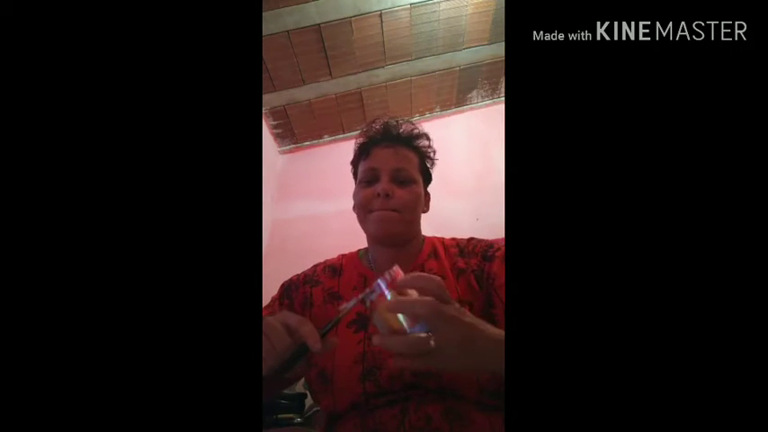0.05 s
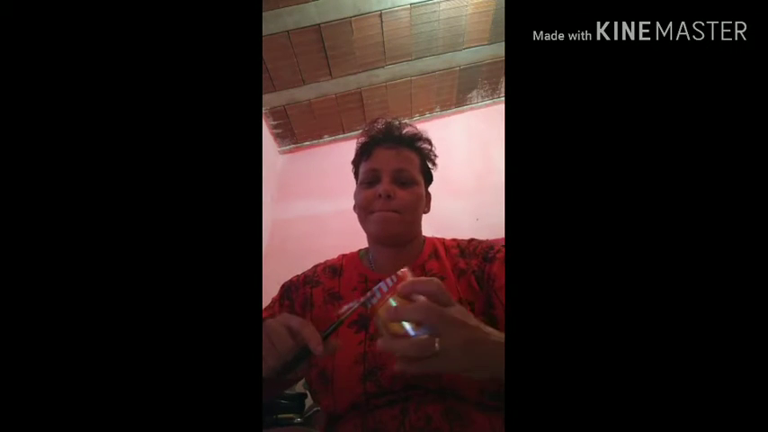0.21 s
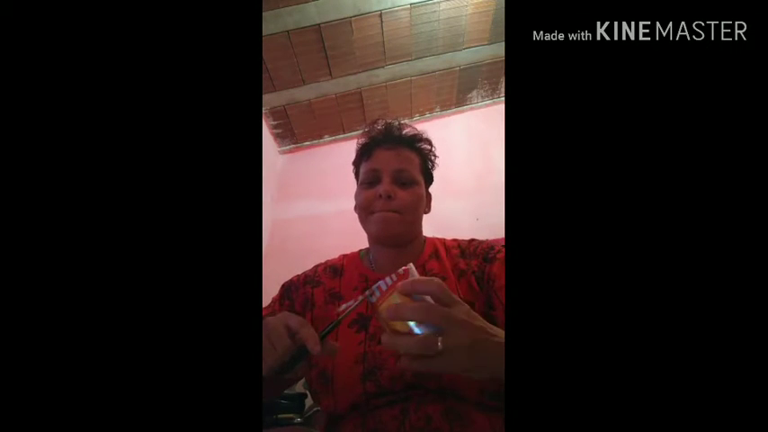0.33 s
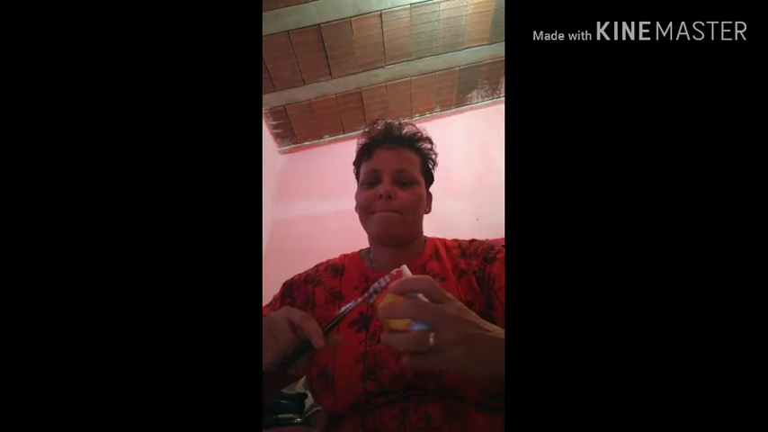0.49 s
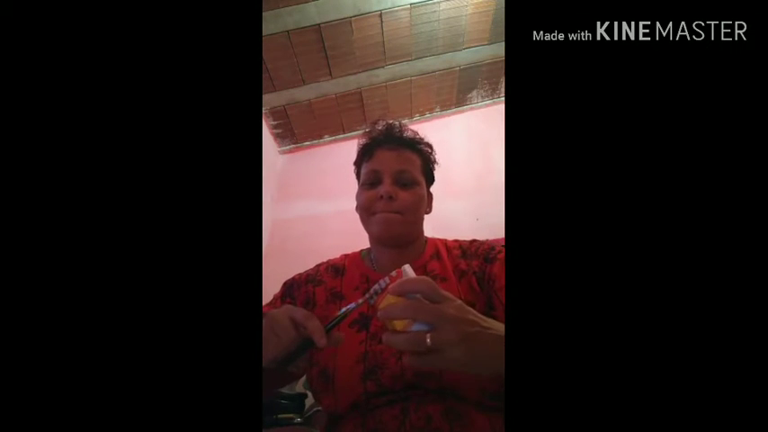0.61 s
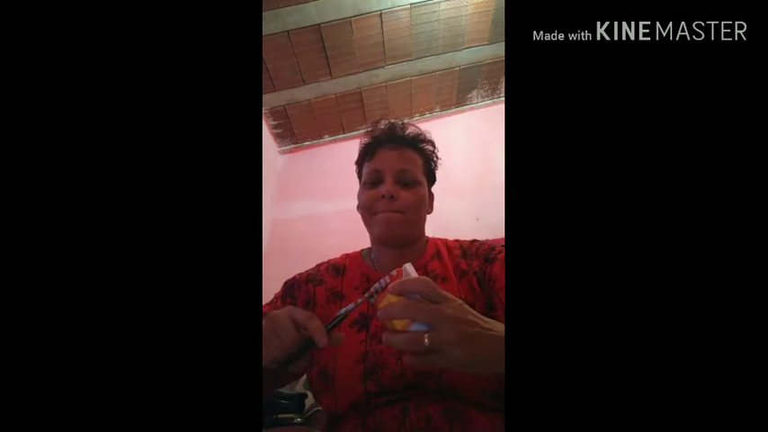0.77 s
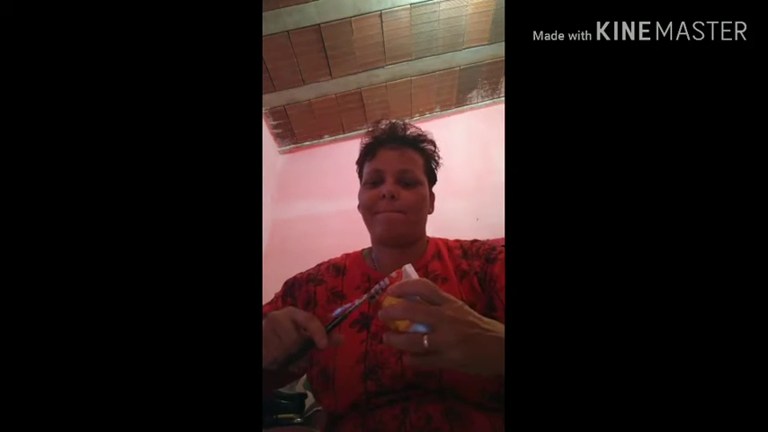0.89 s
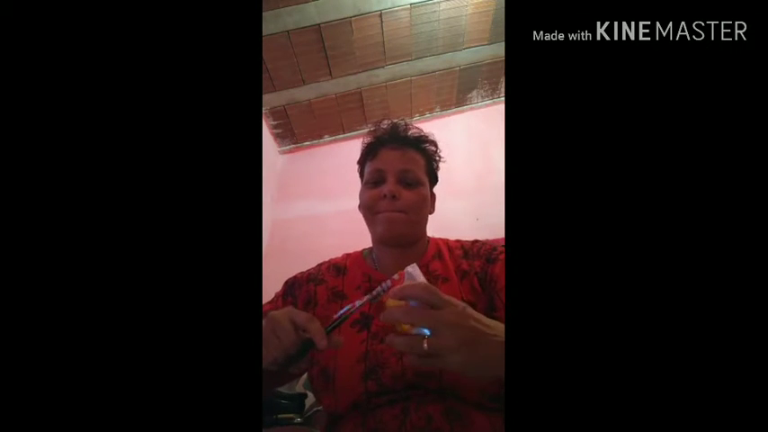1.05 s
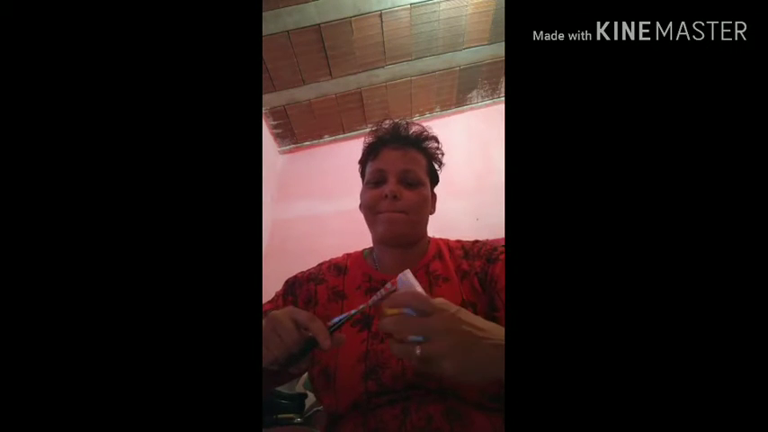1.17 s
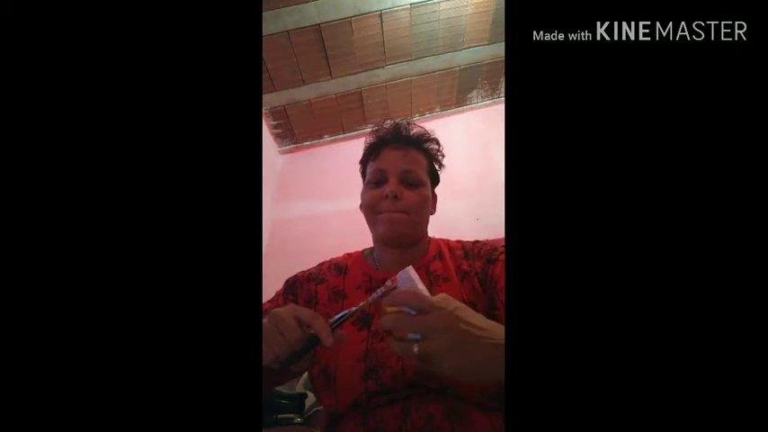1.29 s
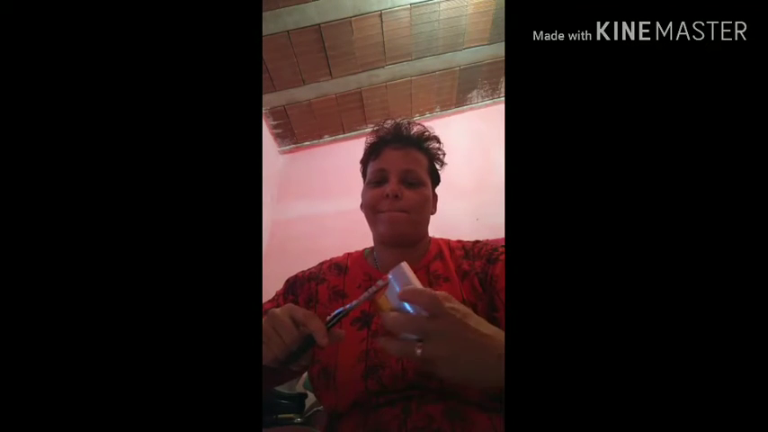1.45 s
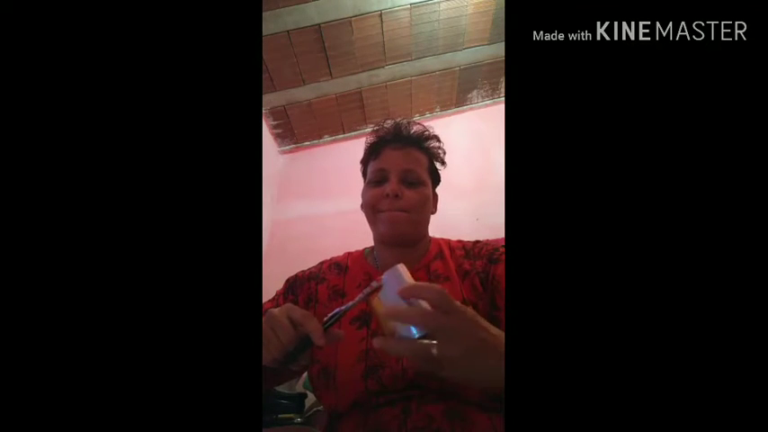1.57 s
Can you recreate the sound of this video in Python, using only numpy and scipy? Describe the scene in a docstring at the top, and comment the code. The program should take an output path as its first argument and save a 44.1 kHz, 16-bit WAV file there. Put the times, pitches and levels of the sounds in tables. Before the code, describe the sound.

A knife cuts a thin hollow can, heard close in a quiet room. After faint hiss, a sharp loud snap and bright scrape burst at 0.2 s, with hollow knocks until 0.4. Rougher scraping and bumps follow at 0.55-0.75, a crisp scratch at 0.83, lighter metallic pings around 0.97-1.13, another strong snap and knocks at 1.24-1.3, then tiny ticks near 1.5. Low handling rumble; treble leans left.

```python
"""Knife cutting into a drink can

A knife cuts into a thin can held near two microphone ports in a quiet room. The wall snaps as dying crackles,
the blade scrapes as dense slips that ring it, and the hollow can booms near 850 Hz in decaying mode pairs.
Resonant noise swells with the effort as a low rumble, over coloured hiss and a noise echo tail.
The left port hears the treble louder and a little earlier."""
import sys
import numpy as np
from scipy import signal
from scipy.fft import rfft, irfft, next_fast_len
from scipy.io import wavfile

SR = 44100
rng = np.random.default_rng(int(sys.argv[2]) if len(sys.argv) > 2 else 0)


def invert_db(level):
    """Linear amplitude ratio for a level in decibels (20 dB per decade), elementwise."""
    return 10 ** (np.asarray(level, dtype=float) / 20)


def pcm_store(signal):
    """Save signal as 16-bit PCM."""
    levels = np.round(np.clip(np.atleast_2d(signal), -1, 1) * 32767)
    wavfile.write(sys.argv[1], SR, levels.astype(np.int16).T)


N = 72765  # length [samples]


def rms_one(x):
    """Scales to rms 1."""
    return x / np.sqrt(np.mean(x ** 2) + 1e-20)


def at_hz(points, hz):
    """Reads a table on a log-frequency axis."""
    p = np.array(points, float)
    return np.interp(np.log(np.maximum(hz, 1)), np.log(p[:, 0]), p[:, 1])


def in_time(rows, column, outside=-120):
    """Reads one column of a curve at every sample; outside=None holds the end values."""
    p = np.array(rows, float)
    return np.interp(np.arange(N) / SR, p[:, 0], p[:, column], left=outside, right=outside)


def coloured(x, spectrum):
    """Gives a white signal of rms 1 a spectrum, keeping its mean power."""
    gain = invert_db(at_hz(spectrum, np.fft.rfftfreq(N, 1 / SR)))
    return irfft(rfft(x) * rms_one(gain), N)


def resonate(x, hz, width_hz):
    """Two-pole resonance with gain 1 on top."""
    r = np.exp(-np.pi * width_hz / SR)
    zeros = [(1 - r * r) / 2, 0, (r * r - 1) / 2]
    poles = [1, -2 * r * np.cos(2 * np.pi * hz / SR), r * r]
    return signal.lfilter(zeros, poles, x + 1e-18)


def body(x, peaks):
    """Parallel resonances with alternating signs; a wide one passes no more noise than a narrow one."""
    out = 0
    for k, (hz, width, db) in enumerate(peaks):
        even_power = np.sqrt(SR / np.pi / width)
        out = out + (-1) ** k * invert_db(db) * resonate(x, hz, width) * even_power
    return out


# spectrum of the room hiss: (frequency [Hz], relative level per Hz [dB])
HISS_SPECTRUM = [(18, -38), (40, -10.5), (120, -8), (250, -24.5), (311, -16.5), (499, -13.5), (889, -27.5),
                 (1040, -30), (1590, -24), (3200, -25.5), (6210, -33.5), (9460, -30.5), (10200, -35.5),
                 (14800, -29.5), (16000, -39)]
# faint thin whines: (frequency [Hz], width [Hz], level [dB])
WHINES = [(10540, 200, -78), (9800, 80, -92)]
HISS_DB, HISS_ALIKE = -68, 0.39  # level; share of the power common to both ports


def hiss():
    """The room's coloured noise, partly alike at both ports, with whines of narrow-band noise."""
    shared, left, right = (coloured(x, HISS_SPECTRUM) for x in rng.standard_normal((3, N)))
    pair = np.sqrt(HISS_ALIKE) * shared + np.sqrt(1 - HISS_ALIKE) * np.array([left, right])
    return invert_db(HISS_DB) * pair + body(rng.standard_normal(N), WHINES)


# swell of the effort: (time [s], upper tones' relative level [dB], lower tones' relative level [dB])
EFFORT_SWELL = [(0.0, -80, -53), (0.16, -76.5, -89.5), (0.202, -89, -64), (0.228, -52, -72),
                (0.256, -52, -61), (0.302, -53.5, -53.5), (0.358, -66.5, -54.5), (0.496, -72, -78),
                (0.532, -51.5, -66), (0.726, -57.5, -52.5), (0.772, -47.5, -53), (0.794, -50, -59.5),
                (0.812, -56, -47.5), (0.89, -50.5, -55.5), (0.922, -68.5, -56.5), (1.13, -69, -64),
                (1.276, -73, -59), (1.318, -56.5, -61), (1.424, -87, -65), (1.506, -73.5, -60),
                (1.636, -63.5, -73), (1.65, -56.5, -74)]
# rumble resonances: (frequency [Hz], width of the narrower pass [Hz], relative level [dB])
RUMBLE_TONES = [(70, 16, -1.5), (95, 19, 1.5), (121.8, 6, 2.5), (177.6, 5.1, -0.5), (230, 16, -16)]
RUMBLE_DB, LOWER_TONES_DB, UPPER_FROM_HZ = 2.5, -4, 140


def rumble():
    """Noise through a few low resonances, twice for dark valleys, swelling with the effort."""
    white = rng.standard_normal((len(RUMBLE_TONES), N + SR // 4))
    upper = in_time(EFFORT_SWELL, 1, None)
    lower = in_time(EFFORT_SWELL, 2, None) + LOWER_TONES_DB
    out = 0
    for (hz, width, db), noise in zip(RUMBLE_TONES, white):
        swell = upper if hz > UPPER_FROM_HZ else lower
        # the first quarter second lets the resonances settle
        tone = resonate(resonate(noise, hz, width), hz, 4.2 * width)[-N:]
        out = out + invert_db(RUMBLE_DB + db + swell) * rms_one(tone)
    return out


# decay of the room: (frequency [Hz], t60 [s])
ROOM_DECAY = [(100, 0.32), (1000, 0.2), (5000, 0.2), (15000, 0.19)]
ROOM_DB, FIRST_ECHO_S = -7.5, 0.0046
RIGHT_ROOM_DB, SHADOW_FROM_HZ = 5, 990  # extra echo at the right port; band floors it applies above


def room(x):
    """Echo tail of noise dying octave by octave, its own at each port; the shadowed right hears more treble."""
    t, tail = np.arange(SR // 2) / SR, 0
    white = rng.standard_normal((2, len(t)))
    for low in 62.5 * 2.0 ** np.arange(8):
        octave = signal.butter(2, [low, 2 * low], "band", fs=SR, output="sos")
        fade = invert_db(-60 * t / at_hz(ROOM_DECAY, np.sqrt(2) * low))
        port_gain = invert_db(np.array([[0], [RIGHT_ROOM_DB * (low > SHADOW_FROM_HZ)]]))
        tail = tail + signal.sosfilt(octave, white) * fade * port_gain
    tail = tail * np.clip(t / FIRST_ECHO_S - 1, 0, 1)
    tail = tail / np.sqrt(np.sum(tail[0] ** 2))
    return invert_db(ROOM_DB) * signal.fftconvolve(x[None], tail, axes=1)[:, :N]


# left port's level above the right's: (frequency [Hz], level [dB])
LEFT_ABOVE_RIGHT = [(60, 11), (110, 14), (200, 3.5), (380, 1), (700, -5), (1290, 3.5), (2380, 13),
                    (4400, 17), (8120, 15), (15000, 13.5)]
# the housing turns the phase at the right port: (frequency [Hz], phase [radians])
HOUSING_TURN = [(500, -0.5), (850, 0.62), (1030, 0.44), (1550, 3.5), (3000, 8)]


def ports(pair, lag_s, turn):
    """The right port lags, loses or gains by frequency, and has its phase turned by the housing if asked."""
    size = next_fast_len(N + 8192)
    hz = np.fft.rfftfreq(size, 1 / SR)
    phase = turn * at_hz(HOUSING_TURN, hz) - 2 * np.pi * hz * lag_s
    path = invert_db(-at_hz(LEFT_ABOVE_RIGHT, hz)) * np.exp(1j * phase)
    padded = np.pad(pair[1], 4096, mode="reflect")
    right = irfft(rfft(padded, size) * path, size)[4096:4096 + N]
    return np.array([pair[0], right])


# the hollow can is knocked or buckles: (time [s], relative level [dB], pitch [Hz], t60 [s])
CAN_KNOCKS = [(0.123, -47.5, 820, 0.11), (0.204, -29.5, 825.5, 0.068), (0.345, -39, 875, 0.093),
              (0.363, -30, 858, 0.065), (0.572, -31, 886, 0.094), (0.618, -33, 905, 0.092),
              (0.655, -30.5, 837, 0.041), (0.676, -50.5, 831, 0.13), (0.736, -29, 870, 0.046),
              (0.946, -54, 903, 0.08), (0.965, -44.5, 922, 0.15), (0.98, -43.5, 879, 0.14),
              (1.051, -32, 870.4, 0.048), (1.23, -40.5, 843, 0.11), (1.258, -34.5, 871, 0.042),
              (1.286, -29, 894.6, 0.06), (1.466, -61, 859, 0.09), (1.514, -67, 880, 0.11)]
KNOCK_DB, KNOCK_RISE_S = 6, 0.0025
PAIR_SPLIT, PAIR_DB = 1.06, -7.5  # second mode: frequency ratio and level to the first


def knocks():
    """The hollow booms as a close pair of modes that beat while they die."""
    out, t = np.zeros(N + SR), np.arange(SR // 2) / SR
    for s, db, hz, t60 in CAN_KNOCKS:
        start = int(s * SR)
        fade = (1 - np.exp(-t / KNOCK_RISE_S)) ** 2 * invert_db(-60 * t / t60)
        tone = np.sin(2 * np.pi * hz * t) + invert_db(PAIR_DB) * np.sin(2 * np.pi * hz * PAIR_SPLIT * t)
        out[start:start + len(t)] += invert_db(db + KNOCK_DB) * fade * tone
    return out[:N]


# single dying tones of the can, from low knocks to high metal pings:
# (time [s], level [dB], pitch [Hz], t60 [s])
SINGLE_TONES = [(0.126, -63, 7250, 0.081), (0.591, -51.5, 492, 0.22), (0.737, -36, 1786, 0.04),
                (0.974, -50, 1760, 0.05), (0.974, -47.5, 2740, 0.077), (.975, -52, 3750, 0.078),
                (1.052, -43, 2314, 0.043), (1.07, -52.5, 2256, 0.14), (1.088, -54, 2320, 0.042),
                (1.05, -51, 3150, 0.068), (1.064, -54.5, 4290, 0.079), (1.13, -52, 2305, 0.082),
                (1.15, -54.5, 4650, 0.061), (1.312, -46.5, 401, 0.081), (1.33, -49.5, 473, 0.079),
                (1.465, -60.5, 5900, 0.044), (1.465, -60, 1880, 0.032), (1.514, -60, 9500, .1),
                (1.515, -55, 5330, 0.026), (1.513, -58, 1737, 0.048), (.221, -33, 787.5, 0.096),
                (.545, -51, 853, .1), (.825, -41, 840, 0.044), (1.135, -54, 827, .08),
                (1.34, -48.5, 890, 0.027), (.01, -66.5, 1258, 0.21), (.98, -49.5, 4750, 0.11),
                (1.218, -45.5, 1764, .08)]
TONE_RISE_S = 0.00067


def single_tones():
    """The can sounds one dying sine at a time, from low knocks to high metal pings."""
    out, t = np.zeros(N + SR), np.arange(SR // 2) / SR
    for s, db, hz, t60 in SINGLE_TONES:
        start = int(s * SR)
        fade = (1 - np.exp(-t / TONE_RISE_S)) ** 2 * invert_db(db - 60 * t / t60)
        out[start:start + len(t)] += fade * np.sin(2 * np.pi * hz * t)
    return out[:N]


# the metal wall snaps: (time [s], relative level [dB], colour [Hz], crackle time constant [ms])
WALL_SNAPS = [(0.2026, -10.5, 13000, 2.2), (0.2077, -9.5, 8280, 2), (0.3101, -27, 6070, 2.2),
              (0.3394, -35.5, 9440, 3.8), (0.3454, -35, 3100, 1.15), (0.3601, -30, 1740, 3.6),
              (0.3821, -25, 8020, 0.83), (0.5542, -39, 5550, 1.8), (0.629, -23, 3300, 1.6),
              (0.6544, -25.5, 7010, 2.7), (0.8278, -45.5, 8330, 1.1), (0.9732, -29.5, 10000, 1.9),
              (0.9782, -33.5, 8270, 2.5), (1, -33, 9670, 2.5), (1.0468, -34.5, 9560, 5.4),
              (1.0674, -35, 9170, 2.5), (1.1265, -40, 10600, 3.3), (1.2396, -15.5, 8520, 2.7),
              (1.2574, -26.5, 1650, 2.5), (1.4653, -58.5, 9510, 3.1), (1.5116, -58, 9600, 2.3)]
# ringing of the wall, also heard in the scrape: (frequency [Hz], undamped width [Hz], relative level [dB])
WALL_MODES = [(4680, 28, 2.5), (4850, 40, -7.5), (7200, 49, -12.5), (7080, 110, -5.5), (8010, 150, 5),
              (8290, 29, -3.5), (8660, 15, -7), (9110, 17, -4), (9540, 120, 7.5), (10370, 38, 3),
              (11060, 44, 3), (10830, 130, -9), (13700, 47, -0.5), (13800, 95, -11)]
WALL_DAMPING = 1.87  # widens every wall resonance
SNAP_DB, SNAP_BROAD_DB, WALL_DB = 4.5, -22.5, -11  # all snaps; uncoloured edge; ringing to snaps
SNAP_Q, SNAP_LOW_CUT_HZ = 3.4, 910


def snaps():
    """Each snap is a dying crackle in its own colour that also rings the wall."""
    out, t = np.zeros(N + SR), np.arange(2048) / SR
    noise = rng.standard_normal((len(WALL_SNAPS), len(t)))
    for (s, db, hz, ms), white in zip(WALL_SNAPS, noise):
        start = int(s * SR)
        burst = white * np.exp(-1000 * t / ms)
        crack = resonate(burst, hz, hz / SNAP_Q) + invert_db(SNAP_BROAD_DB) * np.diff(burst, prepend=0)
        out[start:start + len(t)] += invert_db(db + SNAP_DB) * crack / np.abs(crack).max()
    low_cut = signal.butter(3, SNAP_LOW_CUT_HZ, "high", fs=SR, output="sos")
    cracks = signal.sosfilt(low_cut, out)[:N]
    rung = body(cracks, [(hz, width * WALL_DAMPING, db) for hz, width, db in WALL_MODES])
    return cracks + invert_db(WALL_DB) * rung * np.std(cracks) / np.std(rung)


# blade strokes, one list each: (time [s], relative scrape level [dB], bite above scrape [dB])
# the bite is how far the scrape reaches the middle tones and the hollow
BLADE_STROKES = [
    [(0.19, -90, -1), (0.2, -34, -3), (0.206, -21.5, -14.5), (0.22, -35.5, -3.5), (0.304, -49, -11.5),
     (0.31, -54, 8.5), (0.33, -49.5, -17), (0.342, -46, 4), (0.358, -49.5, -2.5), (0.386, -39, -9),
     (0.392, -51.5, -4.5), (0.47, -68.5, -13)],
    [(0.53, -86, 4), (0.556, -46, -13.5), (0.592, -41.5, -2), (0.616, -42, -8.5), (0.626, -49, 9),
     (0.648, -48.5, -3), (0.656, -50, 5), (0.68, -49.5, 0.5), (0.728, -53, -8.5), (0.734, -57, 1),
     (0.79, -64.5, -11)],
    [(0.79, -53, -15), (0.796, -62, -17), (0.83, -39.5, -28.5), (0.862, -52, -21.5), (0.928, -66, -12),
     (0.96, -71.5, -16)],
    [(0.96, -75, -14), (0.976, -40, -16.5), (1.038, -59.5, -11), (1.052, -43.5, -11.5), (1.116, -63, -19),
     (1.132, -59.5, -15), (1.198, -63, -19), (1.21, -70, -9)],
    [(1.21, -71.5, -3), (1.218, -59, -4), (1.24, -36.5, -6), (1.26, -39, -5), (1.354, -57, -6.5),
     (1.42, -86, -38)],
]
# tones each stroke favours, one list each: (frequency [Hz], undamped width [Hz], relative level [dB])
FAVOURED_TONES = [
    [(8650, 900, -0.5), (1390, 66, -3.5), (2390, 130, -17)],
    [(5900, 170, 12), (1525, 110, -15), (3300, 40, -10), (9200, 970, -1)],
    [(6600, 1000, 19), (5070, 97, 2), (8310, 1300, 19.5)],
    [(10000, 170, 9.5), (1826, 70, 7.5), (3050, 52, 4.5), (3750, 46, -1), (4750, 80, 1.5), (5560, 120, 2.5)],
    [(1730, 130, 17.5), (3790, 220, 17), (8930, 850, 19)],
]
# lower ringing of the wall: (frequency [Hz], undamped width [Hz], relative level [dB])
LOWER_WALL_MODES = [(1650, 100, -10.5), (2380, 120, -27.5), (2547, 88, 7), (3170, 32, -21), (3176, 81, 4.5),
                    (3860, 110, -12), (4270, 47, -6.5), (4660, 66, -7.5), (5200, 30, -10), (6030, 40, 5),
                    (6140, 14, -8.5)]
# spectrum of the bright scrape: (frequency [Hz], relative level per Hz [dB])
EDGE_SPECTRUM = [(3290, -37.5), (5600, -9), (5930, -7), (7190, 3), (10400, -0.5), (14400, -5),
                 (15400, -3.5), (16000, -21)]
# spectrum of the middle tones: (frequency [Hz], relative level per Hz [dB])
BITE_SPECTRUM = [(620, -33.5), (1050, 2), (1550, 2.5), (1970, 4), (2650, -1.5), (3000, -7.5), (3290, -1),
                 (4060, 0), (5600, -1.5), (7280, -38), (12300, -120)]
# resonances of the hollow can: (frequency [Hz], width [Hz], relative level [dB])
HOLLOW_MODES = [(793, 40, -4.5), (849.2, 17, 1), (886, 50, -3)]
SCRAPE_DB, HOLLOW_DB, WALL_IN_SCRAPE_DB = 2, -5, -4
GRAINS_PER_S, GRAIN_SPREAD_DB = 6600, 3.5
RING_SHARE, STROKE_CHANGE_DB = 0.63, 4  # power share of ringing; random spread of the modes per stroke


def scrape():
    """Dense uneven blade slips ring the wall, anew each stroke; a deeper bite reaches mid tones and hollow."""
    sizes = invert_db(GRAIN_SPREAD_DB * np.minimum(rng.exponential(1, (2, N)), 5)) * rng.choice([-1, 1], (2, N))
    slips = rms_one(sizes * (rng.random((2, N)) < GRAINS_PER_S / SR))
    modes = list(LOWER_WALL_MODES) + [(hz, width, db + WALL_IN_SCRAPE_DB) for hz, width, db in WALL_MODES]
    changes = rng.normal(0, STROKE_CHANGE_DB, (len(BLADE_STROKES), len(modes)))
    out = 0
    for rows, tones, change in zip(BLADE_STROKES, FAVOURED_TONES, changes):
        ringing = [(hz, width * WALL_DAMPING, db + c) for (hz, width, db), c in zip(modes, change)]
        ringing += [(hz, width * WALL_DAMPING, db) for hz, width, db in tones]
        rung = rms_one(body(slips, ringing))
        fine, coarse = np.sqrt(1 - RING_SHARE) * slips + np.sqrt(RING_SHARE) * rung
        level_db = in_time(rows, 1)
        deep = invert_db(level_db + in_time(rows, 2))
        bright = invert_db(level_db) * rms_one(coloured(fine, EDGE_SPECTRUM))
        middle = deep * rms_one(coloured(coarse, BITE_SPECTRUM))
        hollow = invert_db(HOLLOW_DB) * body(deep * slips[1], HOLLOW_MODES)
        out = out + bright + middle + hollow
    return invert_db(SCRAPE_DB) * out


CAN_LAG_S, RUMBLE_LAG_S = 0.000484, 0.00007  # the right port hears later
RUMBLE_APART_DB = -9  # a second rumble that only the right port hears


def scene():
    """Can with its room, over rumble and hiss."""
    can = snaps() + knocks() + single_tones() + scrape()
    right_only = rumble() * invert_db(RUMBLE_APART_DB) * [[0], [1]]
    background = rumble() + right_only + hiss()
    return ports(can + room(can), CAN_LAG_S, True) + ports(background, RUMBLE_LAG_S, False)


def roll_off(x):
    """The treble ends steeply here."""
    return signal.sosfilt(signal.butter(12, 16640, fs=SR, output="sos"), x)


OVERLOAD = 0.5  # height at which peaks round off
TOP_CUT_HZ = 16600  # 70 dB down from here up


def record(dry):
    """Peaks are rounded softly, then the top is cut."""
    rounded = OVERLOAD * np.tanh(dry / OVERLOAD)
    top_cut = signal.cheby2(12, 70, TOP_CUT_HZ, fs=SR, output="sos")
    mix = signal.sosfilt(top_cut, rounded)
    return roll_off(mix)


dry = scene()
out = record(dry)
pcm_store(out)
```